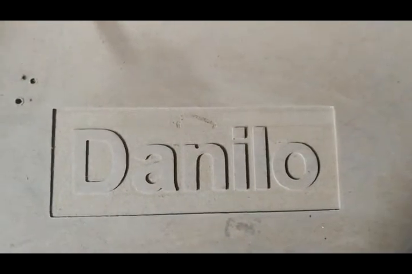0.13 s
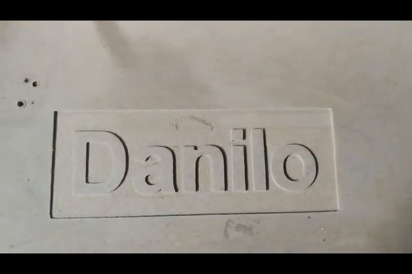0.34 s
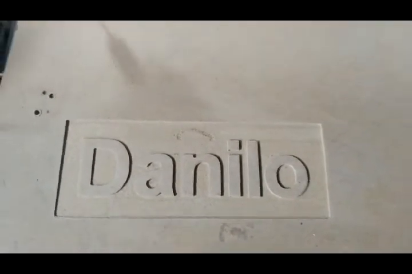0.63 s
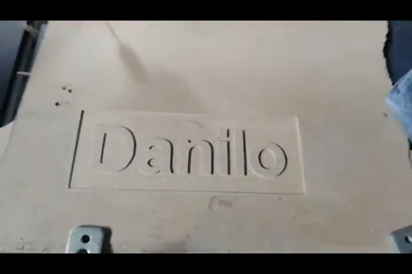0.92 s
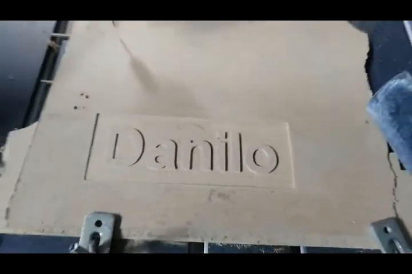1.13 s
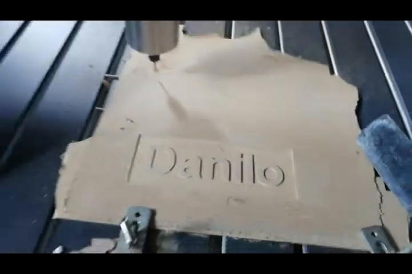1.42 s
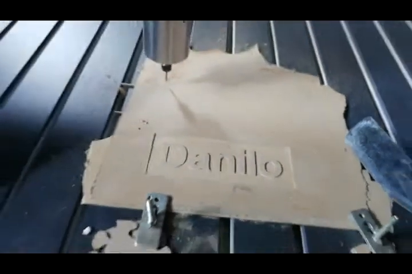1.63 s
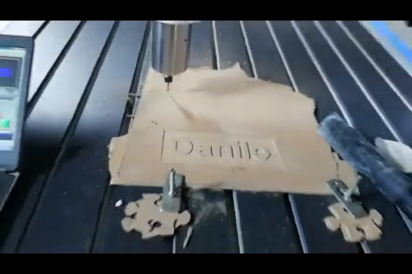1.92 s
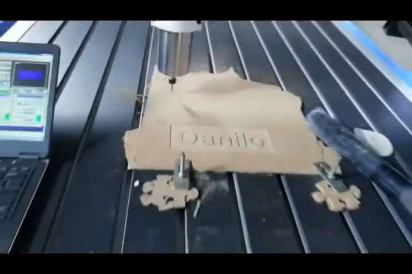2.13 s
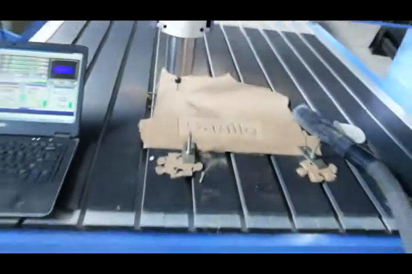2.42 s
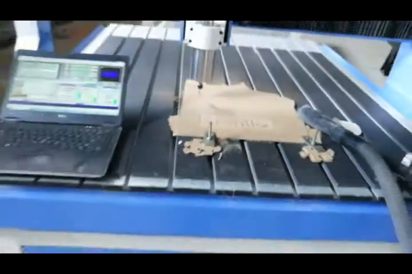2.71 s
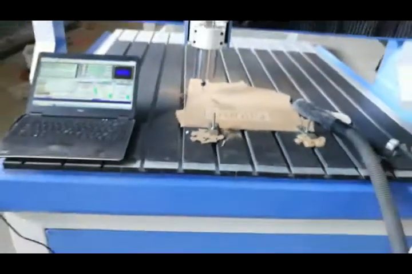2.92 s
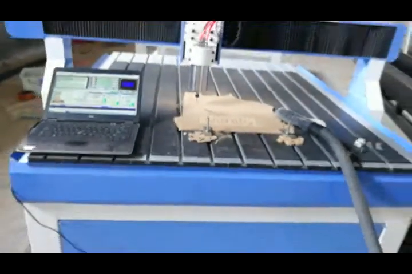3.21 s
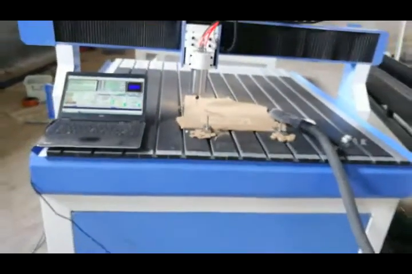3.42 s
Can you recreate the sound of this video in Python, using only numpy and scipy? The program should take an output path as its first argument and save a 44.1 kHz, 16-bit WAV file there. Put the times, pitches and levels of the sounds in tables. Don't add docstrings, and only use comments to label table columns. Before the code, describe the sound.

Steady high spindle whine with airy hiss and machine hum, wavering as the microphone backs away.

```python
import sys
import numpy as np
from scipy import signal
from scipy.io import wavfile
from scipy.ndimage import uniform_filter1d

SR = 44100
rng = np.random.default_rng(int(sys.argv[2]) if len(sys.argv) > 2 else 0)


def invert_db(level):
    return 10 ** (np.asarray(level, dtype=float) / 20)


def digitize_waveform(pressure):
    field = np.atleast_2d(pressure).T
    bounded = np.clip(field, -1, 1)
    quanta = np.round(bounded * 32767).astype(np.int16)
    wavfile.write(sys.argv[1], SR, quanta)


N = 156555

# time in seconds, left port's turn (0 near, 1 far pose),
# right port's turn (same), hiss swell in dB.
PHONE_TURN = [(0, 0.3, 0.04, 1.5), (.3, 0, 0.1, 2.5), (.7, 0.15, 0, 0.5), (1.1, 0.32, 0.02, 1),
              (1.35, 0.2, 0.07, 0.5), (1.6, 0.3, 0.09, -0.5), (1.8, 0.7, 0.53, -1), (2.1, 0.7, 0.6, 0),
              (2.35, 0.56, 0.52, 0), (2.55, .99, .99, 0), (3, 0.74, .99, 0.5), (3.55, 0.94, 0.95, 0.5)]

# frequency in Hz, shared part from 0 to 1.
PORT_LIKENESS = [(60, 0.97), (200, 0.95), (400, 0.88), (690, 0.47), (1100, 0.49), (1700, 0.72),
                 (2100, 0.45), (4500, 0.13)]
# frequency in Hz, phase the right port leads in radians.
PORT_LEAD = [(60, 0.01), (200, 0.22), (350, 1.29), (690, 2.11), (1200, 0.57), (1600, 1), (2000, 3.27),
             (4200, 4.96)]

# frequency in Hz, level in dB per Hz.
RUMBLE_SPECTRUM = [(20, -88), (50, -93), (90, -80), (140, -90), (300, -73.5), (420, -73.5), (520, -89),
                   (800, -110)]
# frequency in Hz, width in Hz, relative level in dB per Hz.
FRAME_MODES = [
    (118.7, 25, 0.8),
    (176.4, 18, 5),
    (227, 22, 0),
    (330, 20, 0),
]
FRAME_DB, LUMP_DB = -22, 3

# frequency in Hz, level in dB per Hz.
LEFT_NEAR_HISS = [(550, -84), (1000, -77), (1900, -70.5), (4300, -73), (6500, -84.5), (9300, -71),
                  (11000, -80.5), (14500, -100)]
LEFT_FAR_HISS = [(550, -75.5), (1000, -72.5), (1900, -65.5), (4300, -73), (6500, -74.5), (9300, -63.5),
                 (11000, -73.5), (14500, -92.5)]
RIGHT_NEAR_HISS = [(550, -79), (900, -73), (1650, -75), (3000, -70), (5200, -70.5), (9000, -56.5),
                   (11500, -77), (14500, -102)]
RIGHT_FAR_HISS = [(550, -75.5), (900, -72.5), (1650, -74), (3000, -71.5), (5200, -70.5), (9000, -76.5),
                  (11500, -88.5), (14500, -93)]
HISS_LOW_HZ = 454
PATCH_DB, SWELL_DB, FLICKER_DB = 1, 0.18, 0.5
RIPPLE_DB = 2.0
# time in seconds, centre in Hz, lift in dB.
TABLE_RIDGE = [
    (0, 3400, 6.2),
    (1.5, 3300, 0.4),
    (2.4, 3420, 2.4),
    (2.9, 3020, 7.7),
    (3.2, 2960, 7.4),
    (3.55, 3300, 5.4),
]
RIDGE_WIDTH_HZ = 230
HOLLOW_DB, HOLLOW_HZ, HOLLOW_WIDTH_HZ = -3.5, 6100, 370
# port (0 left, 1 right), time in seconds,
# half length in seconds, centre in Hz, level change in dB.
HISS_GLINTS = [
    (1, 3.15, .18, 790, 7),
    (1, 3.15, .2, 2100, 4),
    (1, 2.7, .5, 3900, -4),
    (1, .8, .7, 1650, -3),
    (1, 1.9, .2, 1000, 4),
    (1, 2.0, .15, 720, 4),
    (0, 2.9, .6, 1680, 3),
    (0, 1.6, .5, 760, -3),
    (1, 3.4, .2, 520, -4),
]
GLINT_WIDTH = .09

SHAFT_HZ, WOBBLE = 377.82, .0004
# time in seconds, level in dB,
# left-right difference in dB, frame rumble in dB.
SHAFT_HUM = [
    (0, -42, -4, -46),
    (.57, -39.5, -2, -49),
    (1.38, -44.5, -3, -51.5),
    (2.04, -37.5, -3, -55),
    (2.35, -36.5, -5, -57.5),
    (2.87, -42.5, -1.5, -58),
    (3.16, -41.5, -1.5, -52.5),
    (3.26, -48.5, 2, -66),
    (3.35, -62.5, -5, -55.5),
    (3.5, -52.5, -11, -55),
]
HUM_LEAD = 1.65
# order as a multiple of shaft speed, left level in dB, right level in dB.
WEAK_ORDERS = [
    (2, -65, -60.5),
    (8, -63, -67),
    (12.9, -51, -73),
    (19, -73, -63),
    (20.1, -76, -46.5),
    (21, -67, -62),
    (21.6, -66, -44),
    (25.3, -67, -52),
    (36, -64, -73),
]
FADE_PER_S, SCATTER = .35, 0.4
WALK_S, WALK_GAIN = 1.5, 2.5

# node time in seconds, node level in dB, next crest level in dB.
LEFT_HALF_BLADE = [(0.0, -48.0, -58), (0.3, -64, -63), (0.72, -64, -55), (1.43, -62.0, -52),
                   (1.57, -67, -48.5), (2.03, -55, -53), (2.65, -62.0, -47.5), (2.9, -60.0, -49.0),
                   (3.11, -64, -56)]
# node time in seconds, node level in dB, next crest level in dB.
RIGHT_HALF_BLADE = [(0.0, -57.0, -55.0), (0.33, -62.0, -55.0), (0.44, -62.0, -48.0), (1.37, -62.0, -51.0),
                    (1.69, -57.0, -48.0), (2.02, -62.0, -52.0), (2.36, -62.0, -53.0), (2.49, -62.0, -49.0),
                    (3.01, -62.0, -40.0), (3.4, -60.0, -54.0)]
# node time in seconds, node level in dB, next crest level in dB,
# phase the left port leads in radians.
LEFT_BLADE = [(0.0, -49.0, -47.0, -2.0), (0.19, -62.0, -38.0, 0.5), (0.61, -45.0, -35.0, 4.4),
              (0.86, -62.0, -41.0, 7.3), (1.07, -60.0, -37.0, 8.1), (1.54, -62.0, -38.0, 8.6),
              (1.73, -40.0, -38.0, 9.6), (1.8, -59.0, -39.0, 9.1), (1.96, -62.0, -36.0, 7.7),
              (2.22, -43.0, -37.0, 7.9), (2.3, -40.0, -34.0, 9.0), (2.41, -62.0, -34.0, 7.5),
              (2.5, -51.0, -33.0, 8.2), (2.66, -62.0, -32.0, 7.9), (2.86, -38.0, -33.0, 11.5),
              (3.11, -43.0, -41.0, 9.7), (3.18, -49.0, -38.0, 8.2), (3.29, -47.0, -40.0, 9.5),
              (3.45, -43.0, -36.0, 8.7)]
# node time in seconds, node level in dB, next crest level in dB.
RIGHT_BLADE = [(0.0, -50.0, -48.0), (0.18, -44.0, -27.0), (0.63, -39.0, -34.0), (0.69, -37.0, -29.0),
               (0.97, -40.0, -41.0), (1.03, -53.0, -43.0), (1.13, -62.0, -31.0), (1.37, -47.0, -41.0),
               (1.47, -44.0, -38.0), (1.54, -62.0, -45.0), (1.59, -60.0, -32.0), (1.74, -41.0, -34.0),
               (1.84, -36.0, -30.0), (1.95, -36.0, -33.0), (2.05, -47.0, -37.0), (2.15, -42.0, -33.0),
               (2.34, -43.0, -29.0), (2.52, -62.0, -28.0), (2.68, -62.0, -32.0), (2.84, -46.0, -35.0),
               (2.99, -45.0, -37.0), (3.13, -43.0, -36.0), (3.29, -45.0, -31.0), (3.52, -40.0, -38.0)]
# node time in seconds, node level in dB, next crest level in dB,
# phase the left port leads in radians.
LEFT_OCTAVE = [(0.0, -48.0, -46.0, 1.5), (0.24, -62.0, -46.0, 0.0), (0.57, -62.0, -42.0, -0.5),
               (0.89, -55.0, -42.0, -2.9), (1.06, -62.0, -43.0, -4.9), (1.27, -62.0, -43.0, -3.6),
               (1.38, -62.0, -38.0, -2.0), (1.61, -62.0, -40.0, -0.3), (1.79, -46.0, -37.0, -1.5),
               (1.92, -62.0, -41.0, -0.5), (1.99, -61.0, -38.0, 0.6), (2.06, -61.0, -33.0, -1.0),
               (2.22, -39.0, -35.0, -0.5), (2.35, -53.0, -36.0, 0.7), (2.4, -51.0, -36.0, -0.1),
               (2.64, -62.0, -31.0, 1.0), (2.71, -46.0, -32.0, -2.1), (2.8, -46.0, -34.0, 0.1),
               (2.92, -62.0, -33.0, 0.4), (3.05, -62.0, -40.0, 0.1), (3.15, -48.0, -39.0, 0.3),
               (3.27, -62.0, -41.0, 2.3), (3.35, -52.0, -38.0, 1.5), (3.44, -62.0, -35.0, 4.5),
               (3.5, -45.0, -35.0, 5.5)]
# node time in seconds, node level in dB, next crest level in dB.
RIGHT_OCTAVE = [(0.0, -32.0, -30.0), (0.2, -62.0, -30.0), (0.44, -62.0, -31.0), (0.53, -55.0, -30.0),
                (0.75, -45.0, -28.0), (0.85, -41.0, -27.0), (1.04, -39.0, -31.0), (1.15, -55.0, -22.0),
                (1.5, -37.0, -35.0), (1.62, -61.0, -31.0), (1.71, -50.0, -35.0), (1.77, -62.0, -37.0),
                (1.82, -62.0, -37.0), (1.88, -46.0, -37.0), (2.01, -62.0, -43.0), (2.15, -62.0, -41.0),
                (2.22, -62.0, -47.0), (2.29, -62.0, -44.0), (2.45, -62.0, -52.0)]
ROUND_S, FLATTEST, WAVER_DB = .17, .5, 1.6

MASK_DB, BAND_MASK_DB, MASK_SLOPE_DB_PER_KHZ = -14.5, -17.5, 4.2


def evened(x):
    return x / np.sqrt(np.mean(abs(x) ** 2) + 1e-20)


def smooth(field, bins, frames):
    return uniform_filter1d(uniform_filter1d(field, size=bins, axis=1), size=frames, axis=2)


def read(points, hz):
    f, value = np.transpose(points)
    return np.interp(np.log(hz + 1), np.log(f + 1), value)


def along(table, t):
    cols = np.transpose(table)
    return np.array([np.interp(t, cols[0], c) for c in cols[1:]])


def drift(t, per_s):
    rates = np.geomspace(.1, 1, num=16) * rng.choice([-1, 1], size=16)
    phases = rng.random(16)
    return np.exp(2j * np.pi * (np.outer(t, rates * per_s) + phases)).sum(axis=1) / np.sqrt(16)


def blotches(hz, t, size, count):
    return evened(smooth(rng.standard_normal((len(t), len(hz), 2)).T, size, count))


def bump(hz, centre_hz, width_hz):
    return np.exp(-((hz[:, None] - centre_hz) / width_hz) ** 2)


def port_noise(size):
    hz, t, z = signal.stft(rng.standard_normal((2, N)), SR, nperseg=size, noverlap=size * 3 // 4)
    same = np.clip(read(PORT_LIKENESS, hz), 0, 1)[:, None]
    right = same * z[0] + np.sqrt(1 - same ** 2) * z[1]
    lead = np.exp(1j * read(PORT_LEAD, hz))[:, None]
    return hz, t, np.array([z[0], right * lead])


def port_db(hz, t):
    turn = np.clip(along(PHONE_TURN, t)[:2], 0, 1.2)[:, None]
    near = np.array([read(LEFT_NEAR_HISS, hz), read(RIGHT_NEAR_HISS, hz)])[:, :, None]
    far = np.array([read(LEFT_FAR_HISS, hz), read(RIGHT_FAR_HISS, hz)])[:, :, None]
    return near + turn * (far - near)


def rumble():
    hz, t, z = port_noise(size=4096)
    rings = sum(invert_db(db) ** 2 / (1 + (2 * (hz - f) / w) ** 2) ** 2 for f, w, db in FRAME_MODES)
    frame_power = np.outer(rings, invert_db(FRAME_DB + along(SHAFT_HUM, t)[2]) ** 2)
    power = invert_db(read(RUMBLE_SPECTRUM, hz))[:, None] ** 2 + frame_power
    lumps = invert_db(LUMP_DB * blotches(hz, t, size=6, count=3)[0])
    shaped = z * lumps * np.sqrt(power * SR / 2)
    return signal.istft(shaped, SR, nperseg=4096, noverlap=3072)[1][:, :N]


def air():
    hz, t, z = port_noise(size=1024)
    _, right_turn, swell_db = along(PHONE_TURN, t)
    hiss_db = port_db(hz, t) + swell_db + SWELL_DB * drift(t, 6.2).real
    hiss_db += PATCH_DB * blotches(hz, t, size=12, count=20)
    hiss_db += RIPPLE_DB * blotches(hz, t, size=3, count=70)
    hiss_db += FLICKER_DB * blotches(hz, t, size=120, count=4)
    ridge_hz, ridge_db = along(TABLE_RIDGE, t)
    hiss_db[1] += ridge_db * bump(hz, ridge_hz, RIDGE_WIDTH_HZ)
    for port, s, half_s, glint_hz, db in HISS_GLINTS:
        octave_place = np.log((hz[:, None] + 1) / glint_hz) / GLINT_WIDTH
        hiss_db[round(port)] += db * np.exp(-((t - s) / half_s) ** 2 - octave_place ** 2)
    half = np.clip(right_turn, 0, 1)
    half_turned = 4 * half * (1 - half)
    hiss_db[1] += HOLLOW_DB * half_turned * bump(hz, HOLLOW_HZ, HOLLOW_WIDTH_HZ)
    hiss = invert_db(hiss_db) / np.sqrt(1 + (HISS_LOW_HZ / (hz[:, None] + 1)) ** 6)
    return signal.istft(z * hiss * np.sqrt(SR / 2), SR, nperseg=1024, noverlap=768)[1][:, :N]


def standing_wave(table, t):
    cols = np.transpose(table)
    edge = np.r_[cols[0], N / SR + .05]
    place = np.interp(t, edge, np.arange(len(edge)))
    lobe = np.minimum(place.astype(int), len(table) - 1)
    crest = invert_db(cols[2])[lobe]
    shape = np.clip(ROUND_S / np.diff(edge), FLATTEST, 1)[lobe]
    floor = np.minimum(invert_db(np.interp(t, cols[0], cols[1])), crest)
    arch = abs(np.sin(np.pi * place)) ** (2 * shape)
    size = np.sqrt(floor ** 2 + (crest ** 2 - floor ** 2) * arch)
    lead = uniform_filter1d(cols[3][lobe], size=13) if len(cols) > 3 else 0
    return size * invert_db(WAVER_DB * drift(t, 25).real) * np.exp(1j * lead)


def weak_order(k, left_db, right_db, slow):
    walked = slow + WALK_GAIN * np.maximum(slow - WALK_S, 0)
    moves_db = port_db(np.array([k * SHAFT_HZ]), slow)[:, 0]
    port_levels = np.array([[left_db], [right_db]]) + moves_db - moves_db.mean(axis=1, keepdims=True)
    paths = []
    for db in port_levels:
        direct = np.sqrt(1 - SCATTER ** 2) * np.exp(2j * np.pi * rng.random())
        paths.append(invert_db(db) * (direct + SCATTER * drift(walked, k * FADE_PER_S)))
    return paths


def spindle():
    t, slow = np.arange(N) / SR, np.arange(0, N / SR + .01, .005)
    speed = 1 + WOBBLE * np.interp(t, slow, drift(slow, 2.89).real)
    angle = 2 * np.pi * SHAFT_HZ * np.cumsum(speed) / SR
    level_db, pan_db, _ = along(SHAFT_HUM, t)
    hum_db = level_db + 4.0 + np.outer([.5, -.5], pan_db)
    out = np.sqrt(2) * invert_db(hum_db) * np.cos(angle + np.array([[0], [HUM_LEAD]]))
    blades = [(6, LEFT_HALF_BLADE, RIGHT_HALF_BLADE), (12, LEFT_BLADE, RIGHT_BLADE),
              (24, LEFT_OCTAVE, RIGHT_OCTAVE)]
    lines = [(k, [standing_wave(left, slow), standing_wave(right, slow)]) for k, left, right in blades]
    for k, left_db, right_db in WEAK_ORDERS:
        lines.append((round(k), weak_order(k, left_db, right_db, slow)))
    for k, paths in lines:
        for port, path in enumerate(paths):
            in_phase = np.interp(t, slow, path.real) * np.cos(k * angle)
            quadrature = np.interp(t, slow, path.imag) * np.sin(k * angle)
            out[port] += np.sqrt(2) * (in_phase - quadrature)
    return out


def scene():
    return rumble() + air() + spindle()


def low_pass(x):
    return signal.sosfilt(signal.butter(12, 15060, fs=SR, output="sos"), x)


def record(dry):
    hz, _, z = signal.stft(dry, SR, nperseg=2048, noverlap=1536)
    power = abs(z) ** 2 + 1e-16
    slope = MASK_SLOPE_DB_PER_KHZ * hz[:, None] / 1000
    loud_db = smooth(10 * np.log10(power), 40, 5).max(axis=0)
    mask_db = np.maximum.accumulate(loud_db + slope, axis=0) - slope + MASK_DB
    bin_db = 10 * np.log10(smooth(power, 2, 3))
    keep = np.clip((bin_db - mask_db) / 2, 0, 1)
    band_db = 10 * np.log10(abs(uniform_filter1d(power, size=40, axis=1)))
    own_db = 10 * np.log10(abs(smooth(power, 12, 3)))
    keep *= own_db > np.maximum.accumulate(band_db + slope, axis=1) - slope + BAND_MASK_DB
    keep[:, hz < 2000] = 1
    kept = signal.istft(z * keep, SR, nperseg=2048, noverlap=1536)[1][:, :N]
    return low_pass(kept)


dry = scene()
out = record(dry)
digitize_waveform(out)
```